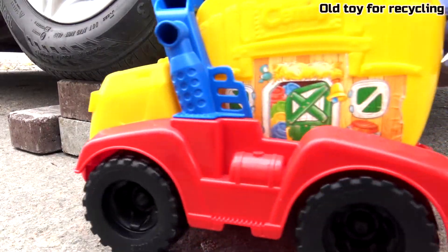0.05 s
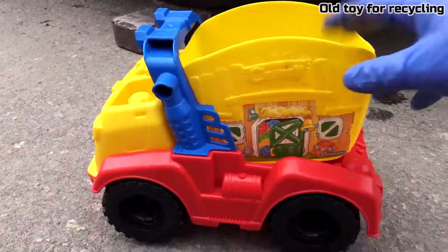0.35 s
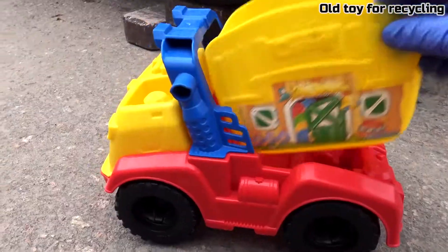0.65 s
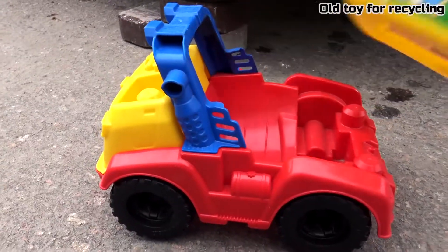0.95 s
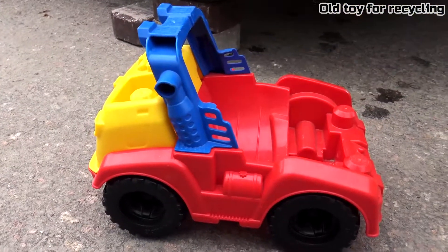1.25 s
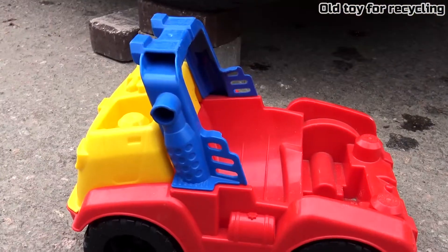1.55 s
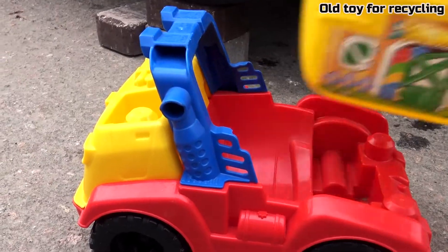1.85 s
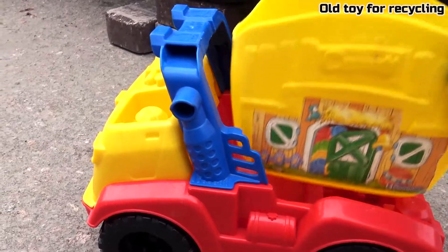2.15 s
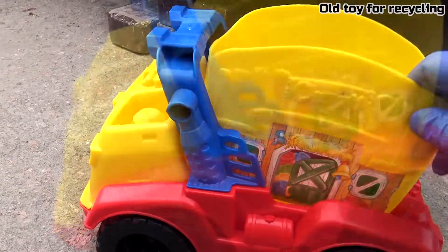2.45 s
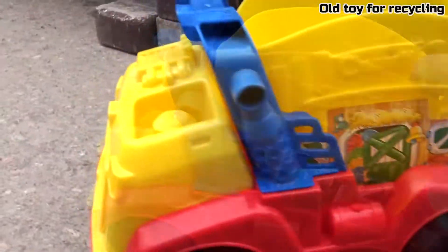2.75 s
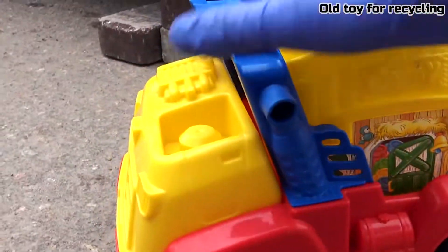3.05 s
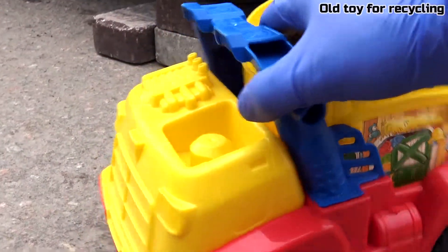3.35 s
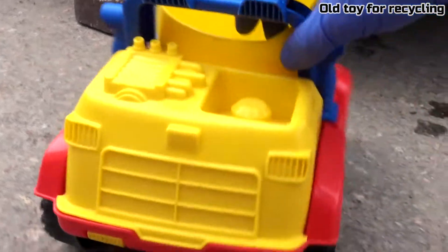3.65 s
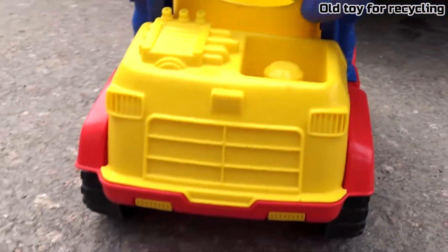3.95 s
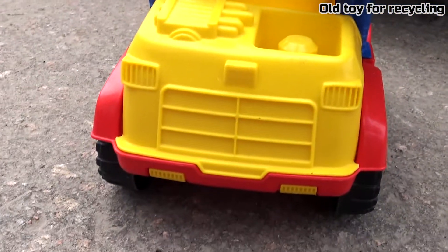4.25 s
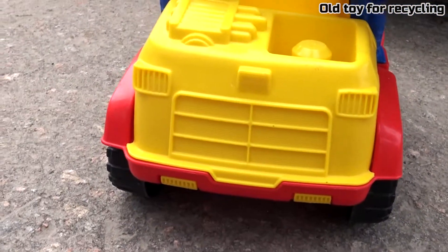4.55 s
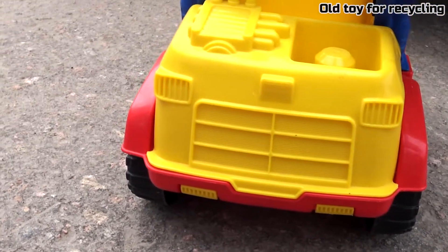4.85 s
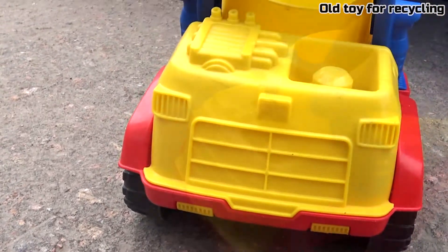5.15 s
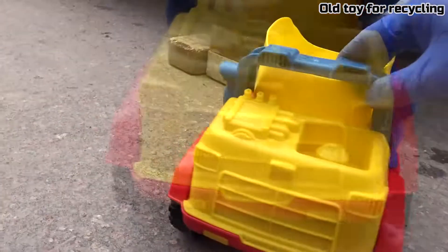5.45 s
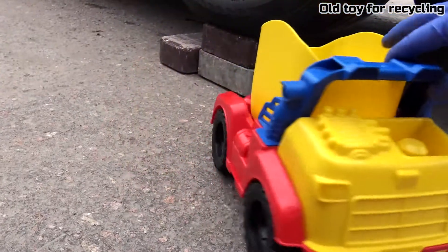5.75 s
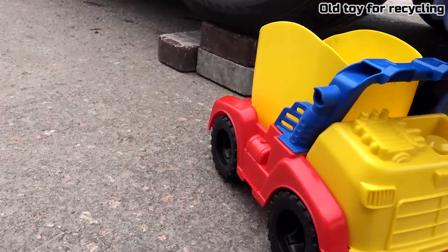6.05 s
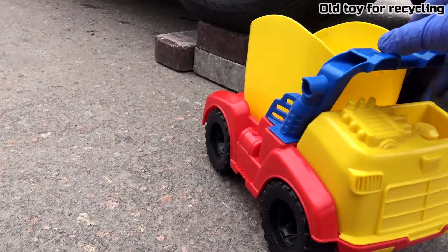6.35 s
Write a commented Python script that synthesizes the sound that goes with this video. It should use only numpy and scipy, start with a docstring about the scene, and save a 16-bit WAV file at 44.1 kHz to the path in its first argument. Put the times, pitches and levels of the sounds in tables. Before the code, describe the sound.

A hollow plastic toy truck knocks and squeaks as it is handled, then rattles over gritty concrete in short pushes, with distant traffic behind.

```python
"""Outdoors on rough concrete, close to a hollow plastic toy dump truck.
Its tipper bucket is pulled off and pressed back in: the shell knocks and rubs, the seat squeaks by
stick-slip. Then three pushes: hard treaded wheels jolt and rattle the shell and scrape over grit.
Far traffic, a little wind and a brief faint hum lie underneath."""
import sys
import numpy as np
from scipy import signal
from scipy.fft import rfft, irfft, next_fast_len
from scipy.io import wavfile
from scipy.ndimage import uniform_filter1d

SR = 44100
rng = np.random.default_rng(int(sys.argv[2]) if len(sys.argv) > 2 else 0)


def store_wav(level_fs):
    """Save 16-bit WAV to argv[1]."""
    pcm = np.round(np.clip(np.atleast_2d(level_fs), -1, 1) * 32767)
    wavfile.write(sys.argv[1], SR, pcm.T.astype(np.int16))


N = 282681

# shell modes: f/Hz, energy/dB, t60/s
SHELL_MODES = [(357, -5, 0.19), (417, -5, 0.1), (550, 8, 0.034), (727, 5, 0.023), (782, -13, 0.14),
               (894.6, 5, 0.049), (1023, 10, 0.012), (1155, 8, 0.031), (1290, 3, 0.051), (1650, -14, 0.08),
               (2010, -13, 0.21), (2610, -7, 0.021), (3814, -22, 0.022), (5330, -18, 0.0082),
               (7030, -23.5, 0.029)]
# pushes: start/s, end/s, speed/dB, speed slope/(dB/s), rattle/dB, sand/dB, axle chirp/dB
TRUCK_PUSHES = [(3.369, 3.908, -8, -10, -8, -30.5, -22.5), (5.175, 5.47, -14.5, 3.5, -11.5, -24, -46),
                (5.606, 5.933, -7.5, -5, -19, -21.5, -43)]
# wheels drop off their treads: t/s, thud/dB, clack/dB
TREAD_JOLTS = [(3.358, -11, -24), (3.396, -17, -16), (3.442, -14.5, -18), (3.47, -10, -21),
               (3.512, -8.5, -32), (3.528, -12, -17.5), (3.547, -15, -18), (3.61, -13, -12.5),
               (3.645, -8, -16), (3.659, -13.5, -22), (3.689, -10.5, -18), (3.712, -11, -14.5),
               (3.736, -9, -17), (3.775, -7.5, -17.5), (3.803, -11, -17.5), (3.854, -9.5, -15),
               (3.875, -9, -23), (3.9, -10, -14), (5.169, -16, -38.5), (5.213, -14.5, -22.5),
               (5.279, -13, -25), (5.298, -13, -19.5), (5.331, -11.5, -20), (5.347, -15, -23),
               (5.371, -15.5, -24), (5.427, -10, -24.5), (5.464, -17, -32), (5.617, -22, -19.5),
               (5.659, -12, -52.5), (5.723, -14, -16.5), (5.747, -10.5, -23), (5.81, -17, -15),
               (5.834, -8.5, -17.5), (5.879, -11, -25), (5.918, -9.5, -21)]
# shell drumming, rolled or rubbed: f/Hz, density/dB
DRUM_SPECTRUM = [(140, -29), (290, -8), (365, 1), (480, -0.5), (630, -7.5), (1150, -11.5), (1500, -19),
                 (1900, -22), (2300, -27), (2750, -30), (3600, -29.5), (4500, -36.5), (7000, -44)]


def from_db(db):
    """Decibels to gain."""
    return 10 ** (np.asarray(db) / 20)


def rms_one(x):
    """Scale to rms 1."""
    return x / np.sqrt(np.mean(x ** 2) + 1e-20)


def at_level(sound, db):
    """Set the rms of the first 10 ms."""
    return from_db(db) * sound / np.sqrt(np.mean(sound[:SR // 100] ** 2))


def band(x, low_hz, high_hz, order=2):
    """Butterworth band-pass."""
    sos = signal.butter(order, [low_hz, min(high_hz, .45 * SR)], "band", fs=SR, output="sos")
    return signal.sosfilt(sos, x + 1e-18)


def brighter(x, amount):
    """Lift the top treble."""
    return x + amount * np.diff(x, n=1, prepend=0)


def colour(x, spectrum):
    """Minimum-phase filter from rows of f/Hz, level/dB; rolls off beyond them."""
    size = 2 * next_fast_len(len(x))
    hz, db = np.transpose(spectrum)
    log_f = np.log(np.maximum(np.fft.rfftfreq(size, 1 / SR), 1))
    outside = np.abs(log_f - np.clip(log_f, np.log(hz[0]), np.log(hz[-1])))
    cepstrum = irfft(np.log(from_db(np.interp(log_f, np.log(hz), db) - 20 * outside)))
    cepstrum[1:size // 2] *= 2
    cepstrum[size // 2 + 1:] = 0
    return irfft(rfft(x, size) * np.exp(rfft(cepstrum)))[:len(x)]


def drift(rate_hz):
    """Random curve through unit-normal knots."""
    knots = rng.standard_normal(2000)
    return np.interp(np.arange(N) / SR * rate_hz, np.arange(len(knots)), knots)


def add(out, at_s, sound):
    """Mix a sound in at a time."""
    at = max(0, round(at_s * SR))
    out[at:at + len(sound)] += sound[:max(0, N - at)]


def dying(t60_s, size=5000):
    """Exponential decay."""
    return from_db(-60 * np.arange(size) / SR / t60_s)


def swell(start, end, attack_s, release_s):
    """1 from start to end, exponential flanks."""
    t = np.arange(N) / SR
    return np.exp(-np.maximum(start - t, 0) / attack_s - np.maximum(t - end, 0) / release_s) + 1e-12


def since(start, end):
    """Seconds since start, held after end."""
    return np.clip(np.arange(N) / SR, start, end) - start


def tone_pulses(rows, envelope):
    """One enveloped sine per row of t/s, f/Hz, peak/dB."""
    out = np.zeros(N)
    t = np.arange(len(envelope)) / SR
    for at_s, hz, db in rows:
        add(out, at_s, from_db(db) * envelope / envelope.max() * np.sin(2 * np.pi * hz * t))
    return out


def grains(per_s, size_db, clump_db, clump_hz):
    """Clumped micro-impacts of uneven size, levelled over 1/16 s."""
    sizes = from_db(size_db * np.minimum(rng.exponential(1, N), 3.5)) * rng.choice([-1, 1], N)
    clicks = (rng.random(N) < per_s / SR) * sizes
    clicks *= from_db(clump_db * drift(clump_hz))
    return clicks / np.sqrt(uniform_filter1d(clicks ** 2, SR // 16) + 1e-6)


def shell_ring(crack_t60_s, tail_db, tail_t60_s, modes_db, spread_db, rise_t60_s):
    """One touch on the shell: crack, diffuse tail, and modes whose strengths depend on the spot."""
    # weak, crowded modes: f/Hz, density/dB
    diffuse_spectrum = [(150, -9.5), (240, -4), (350, 1.5), (480, 6.5), (650, -3), (1100, -15.5),
                        (1500, -2), (2300, -17), (2900, -14.5), (4500, -27), (5500, -24.5), (9000, -32.5),
                        (13000, -39.5), (16000, -36)]
    rise = 1 - dying(rise_t60_s)
    envelope = (dying(crack_t60_s) + from_db(tail_db) * dying(tail_t60_s)) * rise
    t = np.arange(len(envelope)) / SR
    diffuse = colour(envelope * rng.standard_normal(len(t)), diffuse_spectrum)
    hz, db, t60_s = np.transpose(SHELL_MODES)[:, :, None]
    strength = from_db(db + spread_db * rng.standard_normal(hz.shape)) / np.sqrt(t60_s)
    strength *= rng.choice([-1, 1], hz.shape)
    modes = np.sum(strength * np.exp(-np.log(1000) * t / t60_s) * np.sin(2 * np.pi * hz * t), axis=0)
    return rms_one(diffuse) + from_db(modes_db) * rms_one(modes * rise)


def through_shell(clicks, smear_t60_s, ring_db, spots=8):
    """Impacts at several spots take many paths through the plastic and ring its modes."""
    spot = rng.integers(0, spots, N)
    envelope = dying(smear_t60_s) - dying(smear_t60_s / 2)
    paths = rng.standard_normal((spots, len(envelope))) * envelope
    smeared = sum(signal.oaconvolve(clicks * (spot == k), paths[k])[:N] for k in range(spots))
    hz, _, t60_s = np.transpose(SHELL_MODES)[:, :, None]
    t, damping = np.arange(SR // 10) / SR, np.log(1000) / t60_s
    modes = np.sum(2 * damping / SR * np.exp(-damping * t) * np.cos(2 * np.pi * hz * t), axis=0)
    return smeared + from_db(ring_db) * signal.oaconvolve(smeared, modes)[:N]


def blow(hz, thud_db, clack_db, snap_db, width_ratio):
    """Soft contacts thud; harder ones also clack and snap. Treble dies first."""
    ring = shell_ring(crack_t60_s=0.011, tail_db=-1, tail_t60_s=0.07,
                      modes_db=0.5, spread_db=1, rise_t60_s=0.0026)
    thud = at_level(band(ring, hz / width_ratio, hz * width_ratio, order=3), thud_db)
    clack = at_level(band(ring, 1734, 4500, order=3) * dying(0.15), clack_db)
    hardness = 8 * min(from_db(snap_db - thud_db), 1)   # less thud: shorter contact, brighter snap
    snap = at_level(brighter(band(ring, 4030, 13600, order=3), hardness) * dying(0.066), snap_db)
    return thud + clack + snap


def knocks():
    """Hand and bucket knock on the body."""
    # t/s, thud f/Hz, thud/dB, clack/dB, snap/dB
    hits = [(0.004, 520, -18.5, -31, -44.5), (0.107, 460, -17.5, -35, -29.5),
            (0.123, 386, -20.5, -25.5, -52), (0.153, 537, -22, -37, -49), (0.183, 603, -42, -33, -26.5),
            (0.192, 610, -21.5, -32, -27), (0.471, 950, -35, -26, -37.5), (0.551, 900, -16.5, -32.5, -50),
            (0.576, 850, -23, -32, -60), (0.598, 595, -28, -28, -31), (0.604, 900, -18.5, -24.5, -47),
            (0.625, 820, -14, -22.5, -39), (0.662, 650, -32, -39, -65), (0.686, 490, -43, -30, -44),
            (2.336, 630, -25.5, -25, -44), (2.4, 890, -26, -26.5, -46), (2.463, 1160, -19.5, -30.5, -50),
            (2.533, 1300, -24, -37, -60), (2.547, 706, -27.5, -26, -51), (2.624, 656, -26, -36.5, -62),
            (2.776, 550, -29, -31, -61), (2.808, 960, -18, -34, -67), (2.917, 566, -21.5, -34.5, -52),
            (3.317, 1000, -21, -43, -58), (4.01, 446, -14.5, -32, -51), (4.227, 800, -14, -37.5, -62),
            (4.258, 556, -13, -30, -53), (4.298, 920, -22.5, -38.5, -58), (6.262, 454, -27.5, -34.5, -31.5),
            (6.345, 460, -15.5, -26, -41.5), (6.358, 680, -18.5, -18.5, -47),
            (6.396, 1000, -15.5, -29, -53)]
    out = np.zeros(N)
    for at_s, hz, thud_db, clack_db, snap_db in hits:
        add(out, at_s, blow(hz, thud_db, clack_db, snap_db, width_ratio=1.91))
    return out


def jolts(base_hz=800, octaves_per_db=0.0427):
    """Wheels drop off their treads; the harder the clack, the higher the thud."""
    out = np.zeros(N)
    for at_s, thud_db, clack_db in TREAD_JOLTS:
        hz = base_hz * 2 ** (octaves_per_db * (clack_db - thud_db))
        add(out, at_s, blow(hz, thud_db, clack_db, snap_db=clack_db - 16.5, width_ratio=1.98))
    return out


def pings():
    """A single wall of the shell is caught and rings hollow at one pitch."""
    # t/s, f/Hz, peak/dB
    wall_rings = [(0.127, 410, -12), (0.55, 517, -8), (0.613, 1930, -18), (0.626, 830, -9),
                  (5.278, 1650, -17), (5.335, 1230, -9), (5.372, 1390, -15), (5.464, 1290, -7)]
    return tone_pulses(wall_rings, dying(0.029) * (1 - dying(0.017)))


def ticks():
    """Grit cracks and plastic edges click, reaching only the high modes."""
    # t/s, relative level/dB
    clicks = [(0.303, -42.5), (1.247, -50.5), (2.46, -41), (2.47, -43), (2.498, -48.5), (2.59, -43.5),
              (2.846, -42), (3.068, -44.5), (3.166, -38.5), (3.265, -37), (3.375, -29), (3.643, -26.5),
              (3.837, -26.5), (4.125, -50), (4.353, -48.5), (4.998, -41), (5.054, -39), (5.125, -34),
              (5.261, -34), (5.595, -31), (5.681, -35), (5.715, -34), (5.795, -35), (5.869, -27.5),
              (5.972, -40), (6.271, -36.5)]
    out = np.zeros(N)
    for at_s, db in clicks:
        ring = shell_ring(crack_t60_s=0.016, tail_db=-14, tail_t60_s=0.062,
                          modes_db=-36, spread_db=5, rise_t60_s=0.0017)
        add(out, at_s, at_level(brighter(band(ring, 2700, 13400), 0.51), db))
    return out


def push_speeds(surge_db=1.5):
    """Relative speed, one row per push: run-up, mid-push surge, short stop."""
    speeds = []
    for start, end, db, db_per_s, *_ in TRUCK_PUSHES:
        age_s = since(start, end)
        speed_db = db + db_per_s * age_s + surge_db * np.sin(np.pi * age_s / (end - start))
        speeds.append(from_db(speed_db) * swell(start, end, attack_s=0.041, release_s=0.01))
    return np.array(speeds)


def rolling(speeds, drum_db=-1.5, crack_db=-34, sand_exponent=1.35):
    """Rough concrete drums the shell; sand crunches and larger grains burst, all following speed."""
    # f/Hz, density/dB
    sand_spectrum = [(1200, -3), (2800, 7), (4500, -1), (5600, 6), (9000, -0.5), (13000, -10), (16000, -15)]
    speed = speeds.max(axis=0)
    sand_gain = np.max(from_db([[db] for *_, db, _ in TRUCK_PUSHES]) * speeds ** sand_exponent, axis=0)
    drum = grains(per_s=1200, size_db=3.5, clump_db=4, clump_hz=98)
    drum = through_shell(drum, smear_t60_s=0.012, ring_db=-1, spots=5)
    sand = grains(per_s=1200, size_db=3.5, clump_db=7, clump_hz=160)
    sand = through_shell(sand, smear_t60_s=0.0088, ring_db=-8)
    cracks = grains(per_s=32, size_db=-6, clump_db=-22, clump_hz=10)
    cracks = through_shell(cracks, smear_t60_s=0.0068, ring_db=-29)
    return (from_db(drum_db) * speed * rms_one(colour(drum, DRUM_SPECTRUM))
            + sand_gain * rms_one(colour(sand, sand_spectrum))
            + from_db(crack_db) * speed * rms_one(band(cracks, 5000, 13200)))


def rattle(speeds):
    """Loose parts chatter against the moving shell."""
    shake = np.max(from_db([[db] for *_, db, _, _ in TRUCK_PUSHES]) * speeds, axis=0)
    impacts = grains(per_s=600, size_db=1.5, clump_db=4.5, clump_hz=120)
    chatter = through_shell(impacts, smear_t60_s=0.0052, ring_db=7)
    return shake * rms_one(band(chatter, 850, 2100, order=3))


def grinding(speeds, rolling_db=-26, edge_s=0.006):
    """Treads catch on concrete and ring the hollow wheels, most when dragged sideways."""
    # start/s, end/s, level/dB
    drags = [(3.518, 3.571, -22), (3.756, 3.766, -27), (5.256, 5.28, -31), (5.745, 5.776, -30)]
    # f/Hz, width/Hz, level/dB
    wheel_modes = [(1735, 64, -4), (2210, 180, 0), (2740, 260, 3), (3350, 140, -3.5), (5260, 140, -6.5)]
    load = sum(from_db(db) * swell(start, end, edge_s, edge_s) for start, end, db in drags)
    load += from_db(rolling_db) * speeds.max(axis=0)
    catches = grains(per_s=1400, size_db=4, clump_db=8, clump_hz=120)
    rings = sum(from_db(db) * rms_one(band(catches, hz - width / 2, hz + width / 2, order=1))
                for hz, width, db in wheel_modes)
    return load * rms_one(band(rings, 1230, 7400))


def hop_gain(hop_s=0.011, dip_db=2):
    """Wheel noise dips during the hop before each jolt."""
    in_air = np.max([swell(at_s - hop_s, at_s, 0.0016, 0.0032) for at_s, *_ in TREAD_JOLTS], axis=0)
    return from_db(-dip_db * in_air)


def skids(edge_s=0.0063):
    """A wheel skids sideways and crushes sand in bright bursts."""
    # start/s, end/s, level/dB
    bursts = [(3.342, 3.36, -25), (3.43, 3.443, -23), (3.52, 3.535, -26.5), (3.75, 3.774, -30.5),
              (5.26, 5.288, -33.5), (5.724, 5.76, -33)]
    load = sum(from_db(db) * swell(start, end, edge_s, edge_s) for start, end, db in bursts)
    sand = grains(per_s=3300, size_db=3, clump_db=5, clump_hz=120)
    crushed = through_shell(sand, smear_t60_s=0.0013, ring_db=20)
    return load * rms_one(band(crushed, 4500, 15500))


def axles(fade_db_per_s=92, edge_s=0.01):
    """Slipping hubs ring one shrill resonance, then run free soon after each start."""
    drag = sum(from_db(db - fade_db_per_s * since(start, end)) * swell(start, end, edge_s, edge_s)
               for start, end, *_, db in TRUCK_PUSHES)
    slips = grains(per_s=730, size_db=7.5, clump_db=6, clump_hz=69)
    return drag * rms_one(band(slips, 5100, 5750))


def rubbing(judder_trim_db=-3, scuff_trim_db=-2):
    """Glove and bucket slide on the body, shaking the shell and catching in tiny scuffs."""
    # start/s, end/s, judder/dB, scuff/dB (both before trim)
    strokes = [(0.052, 0.117, -23, -41.5), (0.12, 0.25, -30.5, -47.5), (0.332, 0.368, -25, -42),
               (0.504, 0.502, -27, -54), (0.54, 0.7, -27.5, -55), (0.586, 0.645, -17.5, -56),
               (0.873, 0.898, -54, -54), (1.284, 1.384, -53, -57), (1.77, 1.976, -45, -58.5),
               (2.386, 2.45, -18.5, -42.5), (2.487, 2.643, -32.5, -53), (2.736, 3.2, -40.5, -52.5),
               (2.78, 2.81, -27, -55), (2.93, 3.023, -28, -42.5), (3.23, 3.254, -23.5, -38.5),
               (3.289, 3.323, -17, -57), (3.937, 4.171, -27.5, -47.5), (4.892, 4.907, -26, -43.5),
               (4.996, 5.033, -33, -40), (5.5, 5.56, -16, -35), (5.977, 6.006, -23.5, -50),
               (6.097, 6.212, -40.5, -52), (6.303, 6.34, -20, -42)]
    # f/Hz, density/dB
    scuff_spectrum = [(1200, -1), (2800, 12), (4300, 7), (5400, 4), (7000, -0.5), (12000, -2.5),
                      (16000, -8)]
    envelopes = np.array([swell(start, end, 0.026, 0.011) for start, end, *_ in strokes])
    _, _, judder_db, scuff_db = np.transpose(strokes)[:, :, None]
    judder_gain = np.max(from_db(judder_db + judder_trim_db) * envelopes, axis=0)
    scuff_gain = np.max(from_db(scuff_db + scuff_trim_db) * envelopes, axis=0)
    judder = grains(per_s=900, size_db=2, clump_db=4, clump_hz=140)
    judder = through_shell(judder, smear_t60_s=0.0092, ring_db=-4)
    scuffs = grains(per_s=1600, size_db=0.5, clump_db=4.5, clump_hz=110)
    scuffs = through_shell(scuffs, smear_t60_s=0.0053, ring_db=-2)
    return (judder_gain * rms_one(colour(judder, DRUM_SPECTRUM))
            + scuff_gain * rms_one(colour(scuffs, scuff_spectrum)))


def squeaks(harmonics_db=(0, -12, -23, -33), jitter=0.074, sag_hz_per_s=590):
    """The bucket sticks and slips in its seat: rasping tones that swell, sag and fade."""
    # start/s, length/s, slip rate/Hz, level/dB
    slides = [(0.856, 0.062, 580, -35.5), (2.388, 0.022, 580, -12.5), (2.404, 0.058, 590, -11),
              (2.54, 0.047, 580, -21.5)]
    out = np.zeros(N)
    for start, length_s, hz, db in slides:
        age_s = since(start, start + length_s)
        slip_hz = (hz - sag_hz_per_s * age_s) * (1 + jitter * drift(250))
        phase = 2 * np.pi * np.cumsum(slip_hz) / SR
        tone = sum(from_db(level) * np.sin(k * phase) for k, level in enumerate(harmonics_db, 1))
        out += from_db(db) * np.sin(np.pi * age_s / length_s) ** 2 * rms_one(tone)
    return out


def bumps():
    """Deep, quickly damped thumps as the truck is shoved."""
    # t/s, f/Hz, peak/dB
    thumps = [(3.772, 79.5, -24), (5.291, 67, -11.5)]
    return tone_pulses(thumps, dying(0.032) - dying(0.028))


def street():
    """Tyre roar of far traffic and a low rumble, both wavering."""
    # t/s, traffic/dB, rumble/dB
    levels = [(0, -33.5, -32.5), (1, -43.5, -40.5), (2.3, -37, -35.5), (2.7, -32, -33), (5.2, -31.5, -29.5),
              (5.9, -43.5, -36.5), (6.41, -35.5, -37)]
    # f/Hz, density/dB
    traffic_spectrum = [(120, -16.5), (250, 3), (500, -4), (1000, -1), (1400, -7.5), (2000, -15),
                        (3000, -27), (4500, -39), (8000, -44.5), (16000, -46)]
    # f/Hz, density/dB
    rumble_spectrum = [(25, -14), (45, 1), (70, 0.5), (100, -4.5), (130, -2.5), (190, -7), (300, -14.5)]
    times_s, traffic_db, rumble_db = np.transpose(levels)
    t = np.arange(N) / SR
    traffic = rms_one(colour(rng.standard_normal(N), traffic_spectrum))
    rumble = rms_one(colour(rng.standard_normal(N), rumble_spectrum))
    return (from_db(np.interp(t, times_s, traffic_db) + 1.9 * drift(7.2)) * traffic
            + from_db(np.interp(t, times_s, rumble_db) + 2.34 * drift(7.9)) * rumble)


def wind(breeze_db=-28.5, edge_s=0.098):
    """Air buffets the microphone: gusts over a steady breeze."""
    # start/s, end/s, relative level/dB
    gusts = [(2.485, 3.236, -13), (4.01, 5.086, -15), (5.436, 5.566, -11.5)]
    gusting = sum(from_db(db) * swell(start, end, edge_s, edge_s) for start, end, db in gusts)
    eddies = rms_one(band(rng.standard_normal(N), 13.03, 21.44, order=4))
    return (from_db(breeze_db) + gusting) * 0.86 * np.tanh(0.77 * eddies)


def hum(hz=110, level_db=-39, end_s=0.406):
    """A faint low tone that soon fades."""
    tone = rms_one(np.sin(2 * np.pi * hz * np.arange(N) / SR))
    return from_db(level_db) * swell(0, end_s, 0.026, 0.026) * tone


def scene():
    """The truck in front of the street, mono."""
    impacts = knocks() + jolts() + pings() + from_db(4) * ticks()
    speeds = push_speeds()
    wheels = hop_gain() * (rolling(speeds) + rattle(speeds) + grinding(speeds)) + skids() + axles()
    truck = impacts + wheels + rubbing() + squeaks() + bumps()
    return (truck + street() + wind() + hum())[None]


def record(dry):
    """Clip at full scale, low-pass at 16 kHz."""
    lowpass = signal.ellip(10, .1, 60, 16000, fs=SR, output="sos")
    return signal.sosfiltfilt(lowpass, np.clip(dry, -1, 1))


dry = scene()
out = record(dry)
store_wav(out)
```